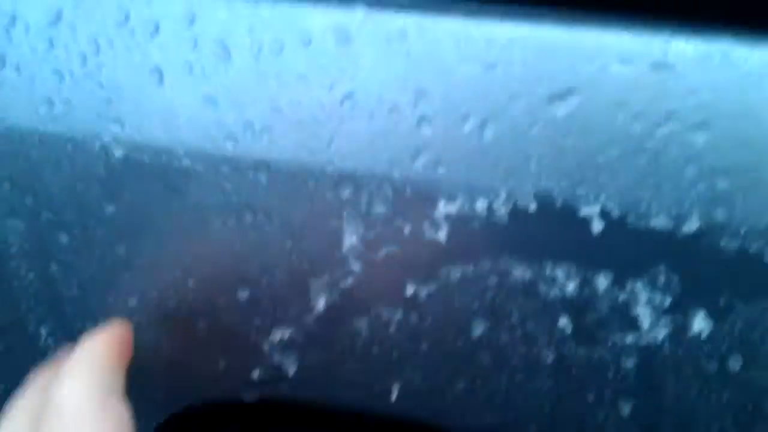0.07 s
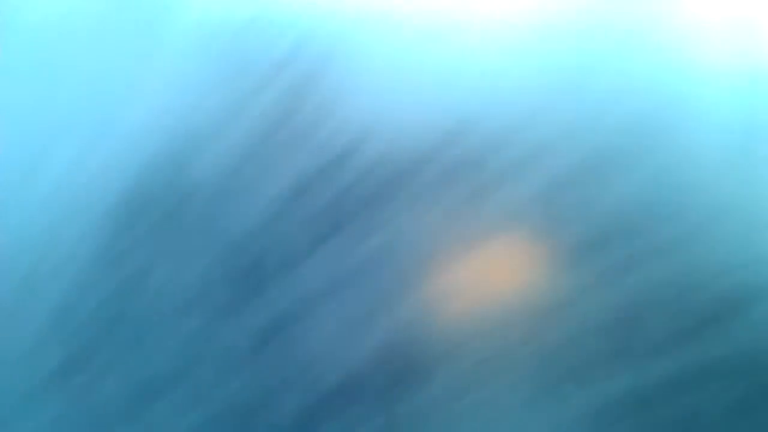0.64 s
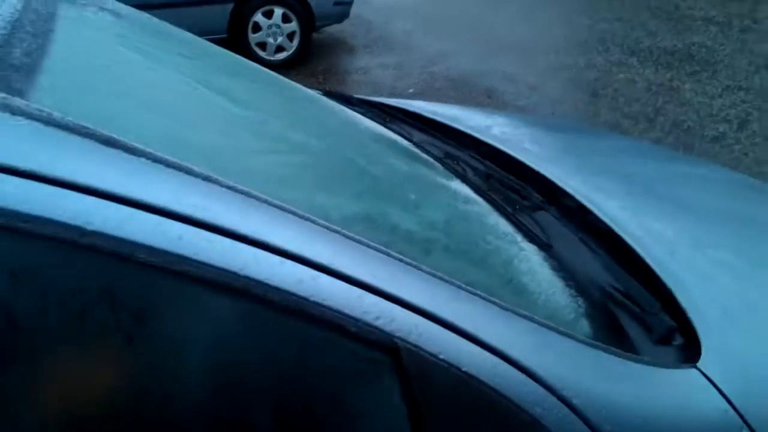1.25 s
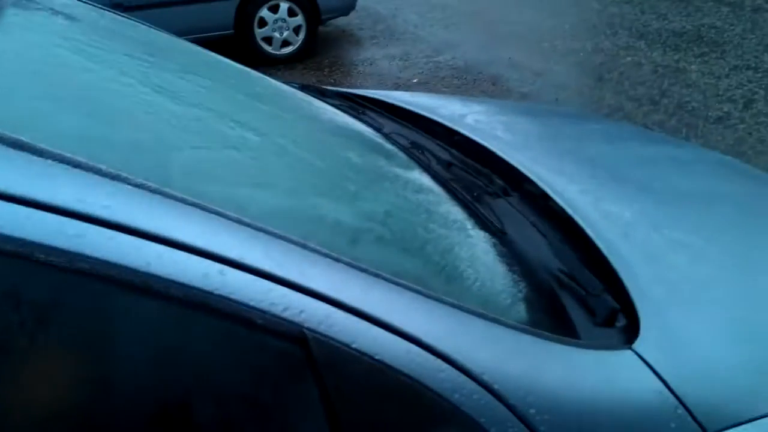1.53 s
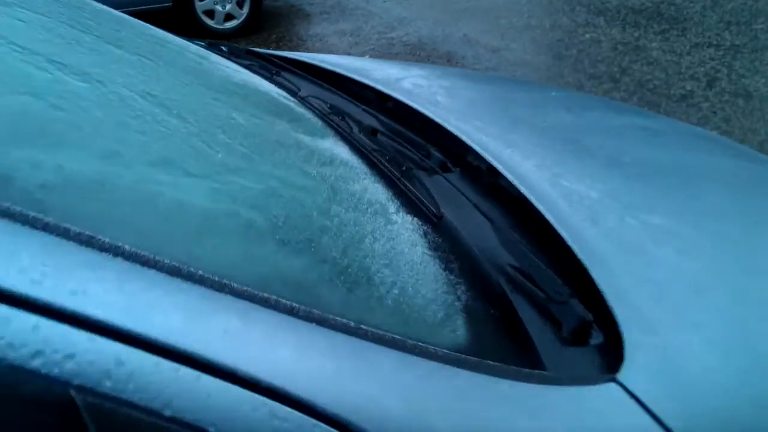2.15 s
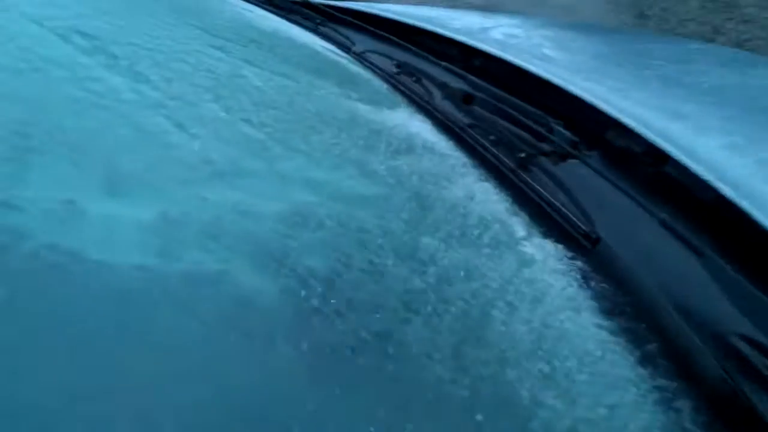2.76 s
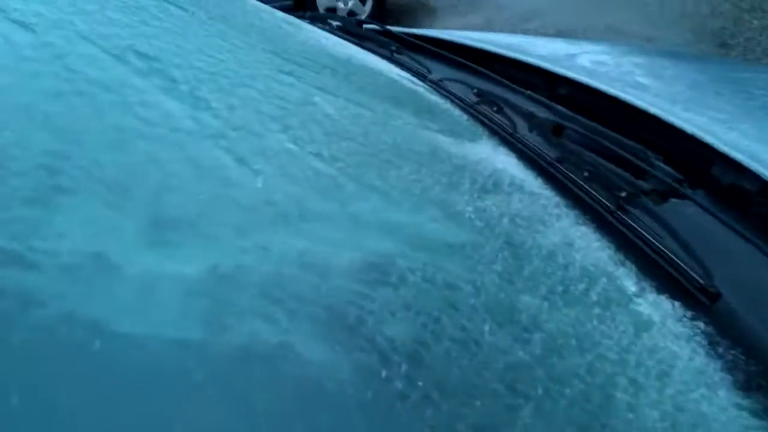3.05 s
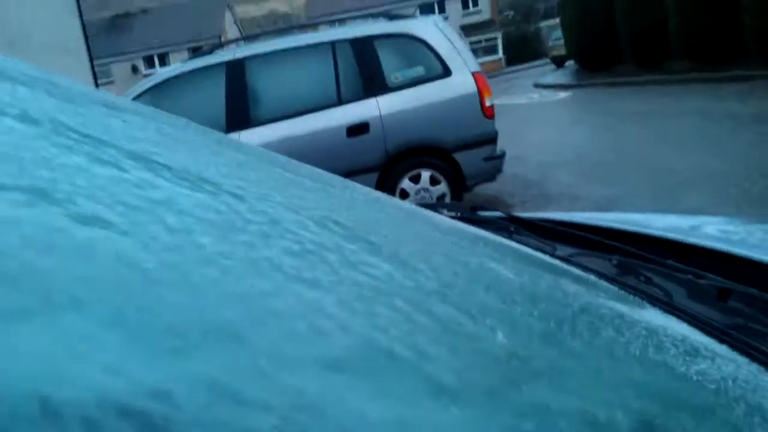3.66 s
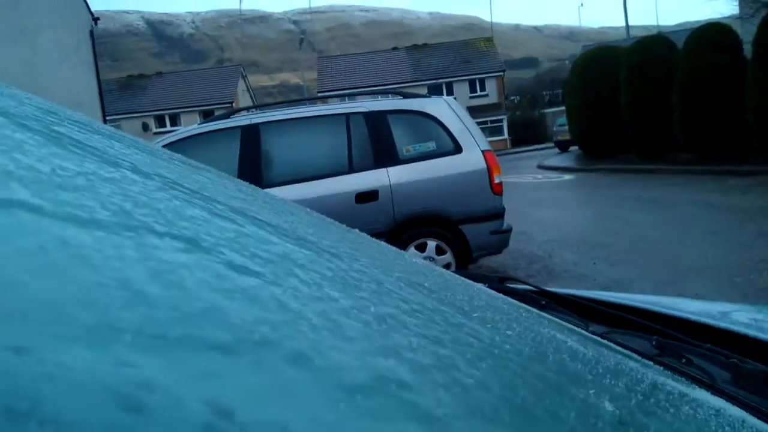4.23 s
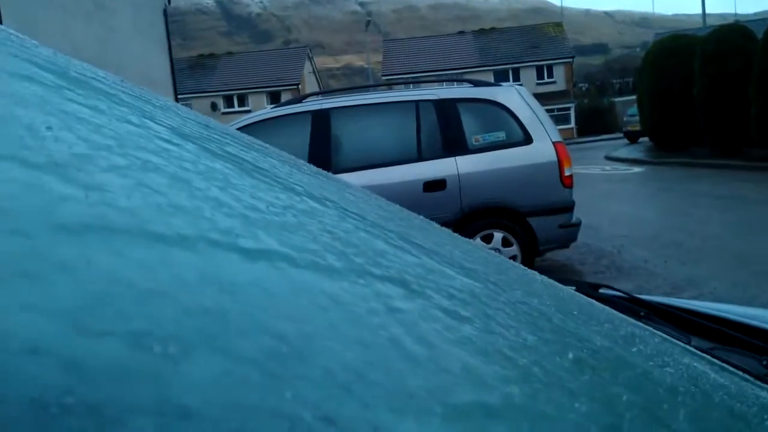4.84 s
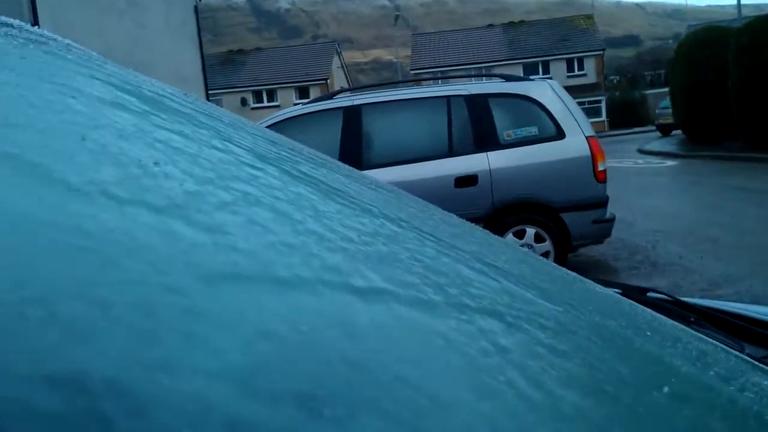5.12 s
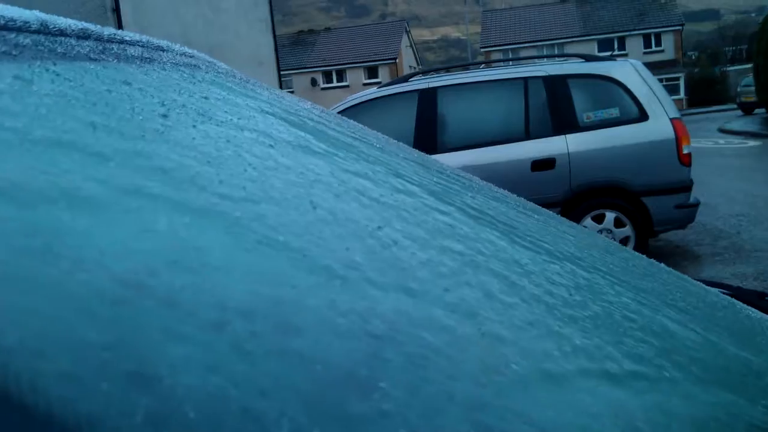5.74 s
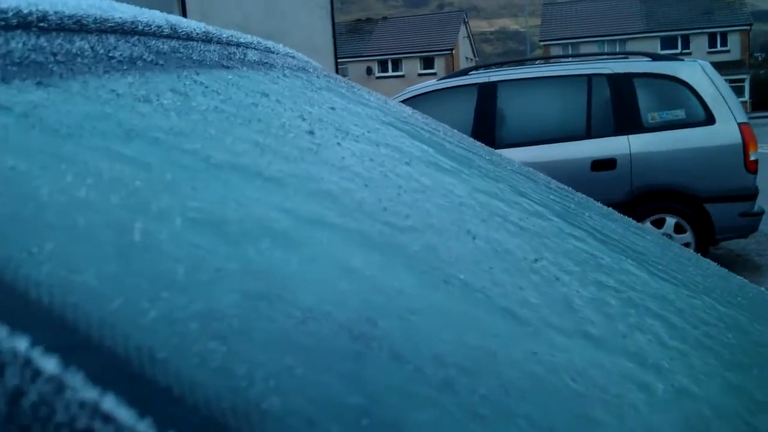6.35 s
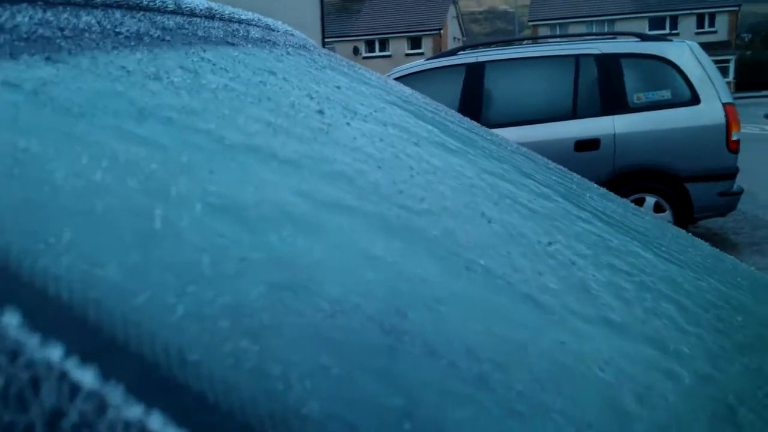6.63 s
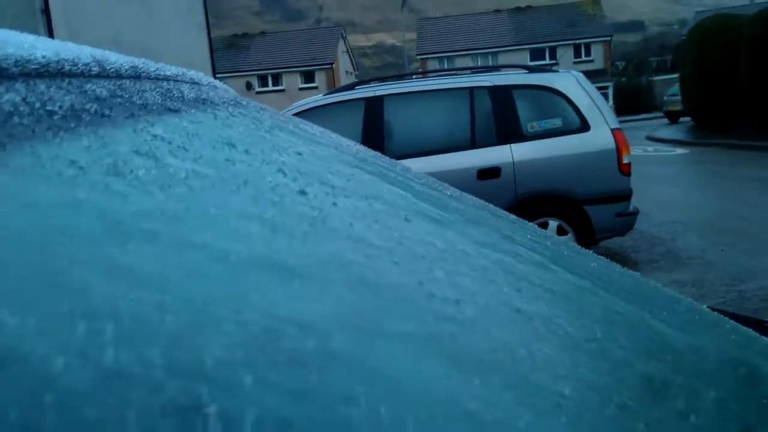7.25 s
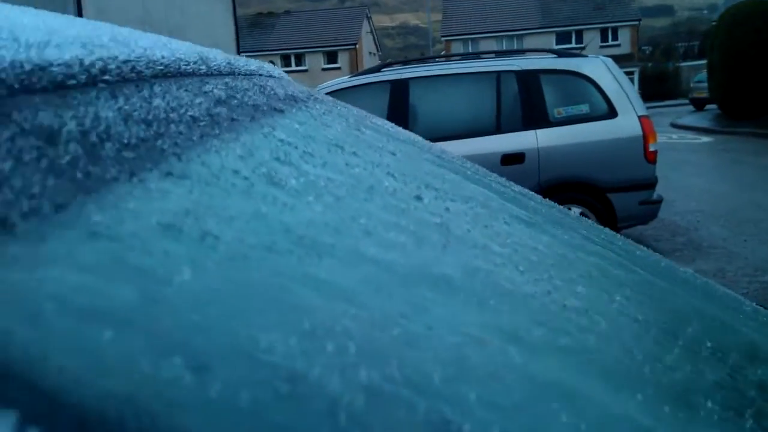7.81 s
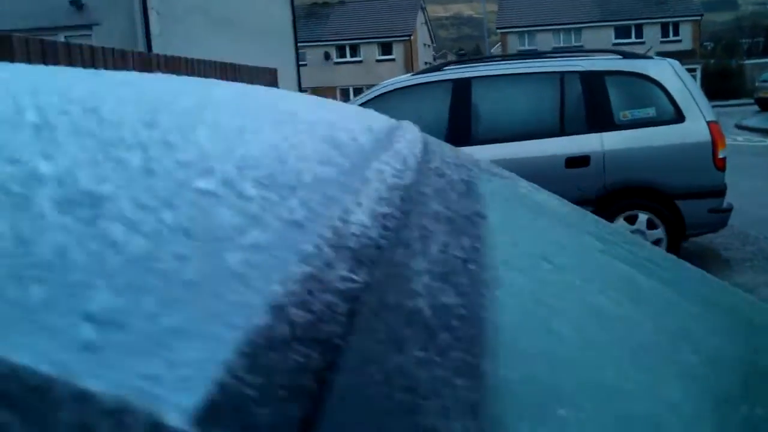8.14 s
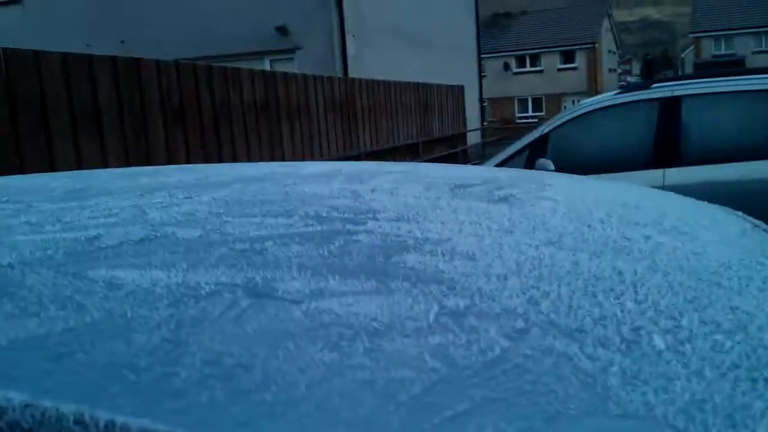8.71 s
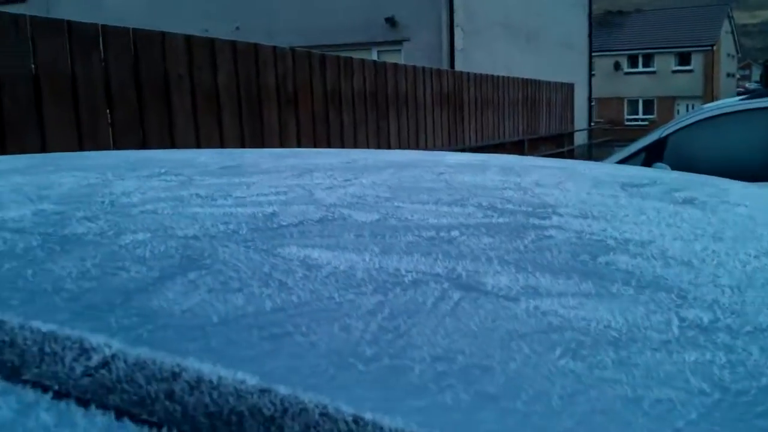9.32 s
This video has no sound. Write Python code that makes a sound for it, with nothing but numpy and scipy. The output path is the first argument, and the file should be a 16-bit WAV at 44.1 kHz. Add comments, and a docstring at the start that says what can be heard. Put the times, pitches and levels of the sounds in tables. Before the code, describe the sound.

In a quiet street with a faint town hum, someone drags their feet over icy ground right by the microphone, with several sharp cracks and knocks. Six hoarse, rattling caws from a crow stand out clearly, overlapping the last scuffs and echoing lightly off the houses. Then small birds take over with distant twittering, two high two-note calls and a brief, closer whistle near the end.

```python
"""A crow caws six times, well to the front of a quiet street on a frosty morning: rough, rattling pulses
ring its throat and open bill. Near the microphone someone scuffs over icy grit beside a car, with
a few sharp knocks, and then stands still. Small birds whistle and chirp in thin gliding tones, some
close, some far off. Behind it all lies the faint wash of the town; the houses echo a little."""
import sys
import numpy as np
from scipy import signal
from scipy.fft import rfft, irfft
from scipy.io import wavfile
from scipy.ndimage import uniform_filter1d

SR = 44100
rng = np.random.default_rng(int(sys.argv[2]) if len(sys.argv) > 2 else 0)


def int16_out(signal):
    """Quantize to a 16-bit WAV file."""
    q = np.round(np.clip(np.atleast_2d(signal).T, -1, 1) * 32767)
    wavfile.write(sys.argv[1], SR, q.astype(np.int16))


N = 413216


# The crow's throat and open bill: frequency_hz, gain_db
THROAT_SPECTRUM = [(250, -87), (500, -35), (720, -22.5), (1080, -9), (1430, -2), (1620, 0), (1820, -2.5),
                   (2130, -14.5), (2400, -24.5), (3080, -21), (3650, -38), (5600, -35.5), (8400, -27),
                   (9500, -41), (13000, -75)]
# The crow as it reaches the microphone, one row a caw: start_s, length_s, level_db
CROW_CAWS = [(2.011, 0.22, -24), (2.536, 0.25, -23), (3.087, .24, -23.5), (3.669, 0.25, -21),
             (4.245, .25, -21.5), (4.845, 0.26, -22)]
def caw(start_s, length_s, level_db, throat_width_hz=260):
    """Uneven pulses, shaken by a slowing rattle, ring a throat that rises and narrows toward the end."""
    sway, jitter, breath, flick, strain = .018, .015, .31, .18, .7
    rattle_depth, rasp_rattle_depth = .34, .48
    count = int(length_s * SR)
    pitch_hz, effort_db, rasp_db, throat_hz, narrow = caw_course(np.arange(count) / SR, length_s)
    rattle_hz = np.linspace(57.33, 36.7, count) * (1 + .04 * wander(count, 20))
    beat = 2 * np.pi * np.cumsum(rattle_hz) / SR
    shake = np.sin(beat)
    cycles = np.cumsum(pitch_hz * (1 + sway * np.cos(beat) + jitter * wander(count, 190))) / SR
    # above the tenth partial only airy rasp is left
    pulses = unit(np.cos(2 * np.pi * np.arange(1, 11)[:, None] * cycles).sum(0))
    puffs = unit((1 + np.exp(-2 * (cycles % 1))) * rng.standard_normal(count))
    air = colour(puffs, [(1000, 12.7), (2200, 15.1), (3400, 16.3), (4500, 16.2)])
    voice = unit(colour(pulses + breath * air, THROAT_SPECTRUM))
    rasp = highpass(voice, 2500, order=4)
    core = voice - rasp
    # each beat of the rattle flicks the resonance from high to low
    ringing = resonate(core, throat_hz * (1 + flick * (1 - narrow) * np.cos(beat)), throat_width_hz)
    core = (1 - narrow) * core + narrow * unit(ringing)
    # strain evens out the core's level; the beats part as the throat narrows
    envelope = uniform_filter1d(abs(signal.hilbert(core)), size=60)
    core = unit(highpass(core / envelope ** strain, 480, order=2))
    rattle = 1 + rattle_depth * (narrow * (shake + np.cos(2 * beat) / 2) + shake / 5)
    voice = core * rattle + rasp * amp(rasp_db) * (1 + rasp_rattle_depth * shake)
    return start_s, voice * amp(level_db + effort_db) * signal.windows.tukey(count, .03)


def caw_course(t, length_s, scoop=.1201, sag=.21, attack_s=.015, release_s=.047):
    """A caw scoops up to its pitch, holds its effort and sags ever faster as the air runs out."""
    progress = t / length_s
    onset = np.exp(-t / attack_s)
    release = np.maximum(1 - (length_s - t) / release_s, 0) ** 2
    pitch_hz = 363.8 * (1 - scoop * onset - sag * progress ** 3.8)
    effort_db = -29 * onset - 16.5 * release
    bill_widest, squeeze_at = .64, .835  # shares of the length
    rasp_db = 3 - 13 * (progress / bill_widest - 1) ** 2
    # the throat resonance climbs, and takes over the voice in a squeeze near the end
    throat_hz = 1260 + 440 * progress
    narrow = .37 + .31 * bell(progress - squeeze_at, .11)
    return pitch_hz, effort_db, rasp_db, throat_hz, narrow


# A scuff's cracking grit, low grinding and bright edge, each: frequency_hz, gain_db
GRIT_SPECTRUM = [(70, -39), (250, -22), (1200, -31), (2500, -12.5), (4200, 0), (6000, 1), (8000, 3.5),
                 (10500, -1), (12000, -30), (16000, -33)]
GRIND_SPECTRUM = [(60, -35), (160, -26), (300, 0), (700, 0), (1800, 9.5), (3200, 4), (6000, 2),
                  (12000, -72)]
EDGE_SPECTRUM = [(4000, -44.5), (8500, -7), (11000, 3.5), (13500, -1.5), (16000, -8)]
# A sole on the ground near the microphone, one row a stroke: peak_s, rise_s, fall_s, level_db, weight_db
SOLE_STROKES = [(.086, .007, 0.026, -37.5, -8.5), (.283, 0.0077, 0.013, -32, -14),
                (0.334, 0.073, 0.046, -26, 3.5), (.61, 0.12, 0.15, -33.5, -5),
                (0.861, 0.083, .14, -32, -4.5), (1.15, 0.058, .055, -50.5, 0.5),
                (1.368, 0.079, 0.056, -42.5, -7.5), (1.46, .09, 0.15, -56.5, 5),
                (1.976, 0.15, 0.079, -57.5, 0.5), (2.256, 0.09, 0.07, -35, 1),
                (2.96, 0.11, 0.34, -64.5, 14), (2.345, 0.0071, 0.046, -47.5, 5), (2.7, 0.19, 0.17, -52, 14),
                (3.262, .15, .11, -38, 5.5), (3.35, 0.11, 0.18, -42.5, -12), (8.45, .4, 0.6, -66, -6)]
def scuffs(grains_per_s=7000, spread_db=1.5, usual_stroke_db=-32, judder_db=1.94):
    """A sole drags over frozen grit: dense tiny cracks, with grinding under weight."""
    t = np.arange(N) / SR
    power = np.zeros((3, N))  # grit, grind, edge
    for peak_s, rise_s, fall_s, level_db, weight_db in SOLE_STROKES:
        grind_db = weight_db - 5
        # a harder stroke has a brighter edge, and weight dulls it
        edge_db = -8 + .59 * (level_db - usual_stroke_db) - .35 * weight_db
        during = (t > peak_s - 2 * rise_s) & (t < peak_s + 2 * fall_s)
        from_peak = np.maximum((peak_s - t[during]) / rise_s, (t[during] - peak_s) / fall_s)
        stroke_db = level_db - 20 * from_peak ** 2
        power[:, during] += amp(stroke_db + np.array([[0], [grind_db], [edge_db]])) ** 2
    sizes = amp(spread_db * np.minimum(rng.exponential(1, N), 4))
    grains = sizes * (rng.random(N) < grains_per_s / SR)
    textures = [unit(colour((grains + .31) * rng.standard_normal(N), spectrum))
                for spectrum in (GRIT_SPECTRUM, GRIND_SPECTRUM, EDGE_SPECTRUM)]
    return (np.sqrt(power) * textures).sum(0) * amp(judder_db * wander(N, 49))


# Close, sharp knocks and cracks among the scuffs: start_s, peak_db, ring_hz, decay_s
SHARP_KNOCKS = [(.471, -31, 1200, 0.0015), (.477, -30, 970, 0.007), (0.513, -26, 3940, 0.0028),
                (.582, -18, 2060, .006), (0.5936, -7.5, 3400, .0009), (.5946, -12, 2200, .003),
                (0.6424, -26.5, 2220, 0.0015), (.656, -27.5, 1830, .0014), (.671, -34, 650, 0.0068),
                (.781, -29, 2710, 0.0061), (1.067, -35, 600, 0.0013), (2.1408, -9, 1700, 0.0011),
                (2.1439, -2.5, 1900, 0.0015), (2.198, -13, 1940, 0.0045), (2.396, -34.5, 1320, .004),
                (2.735, -12.5, 2006, 0.00083), (2.786, -24, 1700, 0.0084), (2.985, -30.5, 1620, .002),
                (3.279, -12.5, 1250, .004), (3.293, -12.5, 1500, 0.008), (3.989, -34, 1734, .0013),
                (8.919, -38, 1930, .0018)]
def knock(start_s, peak_db, ring_hz, decay_s, grit_db=-26, grit_decay_s=.027, rise_s=.00048):
    """A short dead ring with a dry crack, and a little loose grit after it."""
    t = np.arange(SR // 12) / SR
    envelope = np.exp(-t / decay_s) + amp(grit_db) * np.exp(-t / grit_decay_s)
    spectrum = [(60, -36), (ring_hz / 4, -21), (ring_hz / 2, -7), (ring_hz, 0),
                (ring_hz * 2, -12), (ring_hz * 4, -21), (ring_hz * 8, -40)]
    crack = colour(rng.standard_normal(len(t)) * envelope, spectrum)
    ring = np.sin(2 * np.pi * ring_hz * t) * np.exp(-t / min(decay_s, .002)) * (1 - np.exp(-t / rise_s))
    low_cut = signal.butter(1, ring_hz / 3, "high", fs=SR, output="sos")
    sound = signal.sosfilt(low_cut, unit(ring) + unit(crack))
    return start_s, amp(peak_db) * sound / abs(sound).max()


# The low body of the loudest knock: frequency_hz, gain_db
THUMP_SPECTRUM = [(30, -22), (90, -8), (220, 0), (500, -10), (2000, -45)]
def thump(start_s=2.141, peak_db=-45, decay_s=.008):
    """A dull, quickly dying push under the loudest knock."""
    t = np.arange(SR // 12) / SR
    sound = colour(rng.standard_normal(len(t)) * np.exp(-t / decay_s), THUMP_SPECTRUM)
    return start_s, amp(peak_db) * sound / abs(sound).max()


def grit_ticks(ticks_per_s=7, middle_hz=2100, spread_db=4, feet_rest_s=3.6):
    """Stray bits of grit snap at random, more softly once the feet rest."""
    ticks = np.zeros(N)
    count = int(N / SR * ticks_per_s)
    for k, (when, loud, height) in enumerate(rng.random((count, 3))):
        start_s = (k + when) / ticks_per_s
        peak_db = (-43.5 if start_s < feet_rest_s else -47.5) + spread_db * (2 * loud - 1)
        add(ticks, *knock(start_s, peak_db, middle_hz * 2 ** (2 * height - 1), decay_s=.003))
    return ticks


def whistle(start_s, pitch_hz, level_db, warble=.004, warbles_per_s=42, quaver_hz=70, overtone_db=-31):
    """A small bird's thin, warbling, fluttering tone with a wide fringe of hiss."""
    count = len(pitch_hz)
    t = np.arange(count) / SR
    warbled_hz = pitch_hz * (1 + warble * np.sin(2 * np.pi * warbles_per_s * t))
    phase = 2 * np.pi * np.cumsum(warbled_hz + quaver_hz * wander(count, 650)) / SR
    tone = unit(np.sin(phase) + amp(overtone_db) * np.sin(2 * phase))
    flutter_db = 3 * wander(count, 160)
    hiss_spectrum = [(1500, -53), (3500, 2), (6500, 4.5), (9000, -4), (15000, -15)]
    hiss = unit(colour(rng.standard_normal(count), hiss_spectrum))
    sound = amp(flutter_db - 7.5) * tone + amp(-23) * hiss
    return start_s, sound * amp(level_db) * signal.windows.tukey(count, .06)


# A small bird that carries clearly down the street, one row a "tsee-tsu": start_s, pitch_hz, gain_db
TWO_NOTE_CALLS = [(6.172, 6190, -25.5), (7.377, 5950, -29.5)]
def tsee(start_s, pitch_hz, gain_db, length_s=.1285, swell_db=14.5, hook_s=.0084):
    """The first note swells and creeps upward, then ends in a hook."""
    t = np.arange(0, length_s, 1 / SR)
    climb = .04 * t / length_s
    hook = .1 * bell(t - length_s + hook_s, hook_s)
    level_db = gain_db - swell_db * (1 - t / length_s) ** 2
    return whistle(start_s, pitch_hz * (1 + climb + hook), level_db, warble=.018)


def tsu(middle_s, gain_db, length_s=.08, first_hz=6680, last_hz=5610, slur_s=.0106, fade_db_per_s=750):
    """The second note slurs from high to low, loudest on the way down."""
    t = np.arange(-length_s / 2, length_s / 2, 1 / SR)
    pitch_hz = first_hz + (last_hz - first_hz) * (1 + np.tanh(t / slur_s)) / 2
    return whistle(middle_s + t[0], pitch_hz, gain_db - fade_db_per_s * abs(t))


def high_note(start_s=8.999, length_s=.14, pitch_hz=8350, gain_db=-32, dip_at_s=.037, dip_width_s=.029):
    """A bird closer to the microphone holds one high whistle that dips in pitch and recovers."""
    t = np.arange(0, length_s, 1 / SR)
    dip = .08 * bell(t - dip_at_s, dip_width_s)
    return whistle(start_s, pitch_hz * (1 - dip), gain_db)


# The closer bird's lower voice, one row a yip: peak_s, rise_s, fall_s, top_hz, gain_db
CLOSE_YIPS = [(9.058, .036, .022, 4135, -20.5), (9.122, .018, .018, 3650, -25)]
def yip(peak_s, rise_s, fall_s, top_hz, gain_db, depth_db=20, octaves_per_db=.02):
    """A whistle whose pitch and level arch together with the bird's effort."""
    t = np.arange(-rise_s, fall_s, 1 / SR)
    effort_db = -depth_db * np.maximum(-t / rise_s, t / fall_s) ** 2
    pitch_hz = top_hz * 2 ** (octaves_per_db * effort_db)
    return whistle(peak_s - rise_s, pitch_hz, gain_db + effort_db, overtone_db=-19)


# Small birds around the street: start_s, length_s, first_hz, last_hz, level_db, hoarse_share (of pitch)
STREET_CHIRPS = [(1.339, 0.038, 1650, 1600, -43, .011), (1.574, .094, 7350, 6250, -65.5, .004),
                 (2.338, .032, 6850, 6800, -49, .003), (5.368, .058, 6250, 5200, -62, .004),
                 (5.712, .11, 4580, 3800, -54.5, 0.25), (6.443, 0.039, 4400, 3850, -51.5, 0.052),
                 (6.52, .045, 4930, 5070, -60, .004), (6.64, 0.06, 4720, 4880, -57, .008),
                 (6.694, 0.033, 4800, 3750, -57, 0.012), (7.651, .067, 4200, 4170, -55.5, 0.24),
                 (7.74, 0.059, 4830, 4480, -51.5, 0.0092), (7.991, .035, 6100, 6600, -58.5, 0.016),
                 (8.12, 0.069, 3560, 3470, -51.5, 0.044), (8.512, .025, 3650, 3100, -56, .02),
                 (8.952, 0.046, 5230, 5050, -59, .005), (8.992, 0.043, 8500, 8030, -37, 0.077),
                 (8.998, 0.044, 4840, 4460, -40, 0.32)]
def chirp(start_s, length_s, first_hz, last_hz, level_db, hoarse_share):
    """A short glide; an unsteady pitch makes it hoarse."""
    count = int(length_s * SR)
    unsteady = np.exp(hoarse_share * np.clip(wander(count, 900), -2, 2))
    pitch_hz = np.geomspace(first_hz, last_hz, count) * unsteady
    tone = unit(np.sin(2 * np.pi * np.cumsum(pitch_hz) / SR))
    return start_s, amp(level_db) * tone * signal.windows.tukey(count, .7)


# Sparrow-like chatter, faint at the microphone, one row a burst: start_s, length_s, level_db
CHATTER_BURSTS = [(5.747, 0.086, -54.5), (6.596, 0.052, -48.5), (6.637, 0.037, -58.5), (7.072, 0.064, -58),
                  (7.8, 0.088, -59.5)]
def chatter(start_s, length_s, level_db, pitch_hz=2470, pulses_per_s=85, depth=.67):
    """A hoarse note broken into quick pulses."""
    _, note = chirp(start_s, length_s, pitch_hz, pitch_hz, level_db, hoarse_share=.123)
    t = np.arange(len(note)) / SR
    return start_s, note * (1 + depth * np.sin(2 * np.pi * pulses_per_s * t))


def distant_twitter(from_s=3.9, notes_per_s=17, middle_hz=4200, level_db=-66, spread_db=3.5, echo_db=-1):
    """Songbirds far off: short glides, mostly falling, clear or hoarse, blurred by the street."""
    notes = np.zeros(N)
    count = int((N / SR - from_s) * notes_per_s)
    for k, (when, length, height, slope, loud, rough) in enumerate(rng.uniform(-1, 1, (count, 6))):
        start_s = from_s + (k + when) / notes_per_s
        length_s = .038 * 2 ** length
        first_hz = middle_hz * 1.55 ** height
        last_hz = first_hz * (.86 + .22 * slope)
        add(notes, *chirp(start_s, length_s, first_hz, last_hz, level_db + spread_db * loud, .1 * abs(rough)))
    return notes + amp(echo_db) * street_echo(notes)


# How long sound lingers between the houses: frequency_hz, t60_s
STREET_DECAY = [(300, 2.7), (1700, 2.24), (4000, 3.8), (9000, 0.85), (15000, 0.39)]
def street_echo(x, delay_s=.0067, reflections_per_s=1500):
    """Sparse late reflections from the houses; the highest treble dies first."""
    count = 3 * SR // 2
    reflections = rng.standard_normal(count) * (rng.random(count) < reflections_per_s / SR)
    reflections *= np.arange(count) > delay_s * SR
    hz, t, bands = signal.stft(reflections, SR, nperseg=256)
    decay = amp(-60 * t / read_curve(STREET_DECAY, hz)[:, None])
    _, tail = signal.istft(bands * decay, SR, nperseg=256)
    return signal.fftconvolve(x, tail / np.linalg.norm(tail))[:N]


# The far town as heard from the street: frequency_hz, gain_db
TOWN_SPECTRUM = [(18, -74), (30, -40), (38, -60.5), (251, -4.5), (424, -3), (471, 0), (596, -3),
                 (931, -2.5), (1750, -9), (2390, -10.5), (3190, -17.5), (3450, -10.5), (5830, -21),
                 (9350, -19.5), (15800, -21)]
def town_wash(level_db=-57, swell_db=.63, drift_db=.8):
    """The wash of the far town; its lower and upper parts drift apart a little in level."""
    town = unit(colour(rng.standard_normal(N), TOWN_SPECTRUM, size=8192))
    upper = highpass(town, 660, order=3)
    lower = town - upper
    swell = amp(level_db + swell_db * wander(N, 6.4))
    return swell * (upper + lower * amp(drift_db * wander(N, 5.0)))


def amp(db):
    """Decibels to gain."""
    return 10 ** (np.asarray(db) / 20)


def unit(x):
    """Scales to rms 1."""
    return x / np.sqrt(np.mean(x ** 2) + 1e-20)


def bell(x, width):
    """A smooth bump of height 1 around zero."""
    return np.exp(-(x / width) ** 2)


def wander(count, rate_hz):
    """A smooth random curve of rms 1, no faster than about rate_hz."""
    hz = np.fft.rfftfreq(count, 1 / SR)
    spectrum = rfft(rng.standard_normal(count))
    return unit(irfft(spectrum * (hz > 0) / (1 + (hz / rate_hz) ** 4), count))


def read_curve(points, hz):
    """Interpolates (frequency_hz, value) points on a log-frequency axis."""
    point_hz, values = np.transpose(points)
    return np.interp(np.log(hz + 1), np.log(point_hz), values)


def colour(x, spectrum, size=2048):
    """Causal filter through the given (frequency_hz, gain_db) points."""
    log_gain = np.log(amp(read_curve(spectrum, abs(np.fft.fftfreq(size, 1 / SR)))))
    taps = np.fft.ifft(np.exp(np.conj(signal.hilbert(log_gain)))).real  # minimum phase
    return signal.oaconvolve(x, taps)[:len(x)]


def highpass(x, hz, order):
    """Keeps what lies above hz, without delay."""
    return signal.sosfiltfilt(signal.butter(order, hz, "high", fs=SR, output="sos"), x)


def resonate(x, hz, width_hz):
    """A resonance of gain 1 that follows the curve hz."""
    carrier = np.exp(2j * np.pi * np.cumsum(hz) / SR)
    pole = np.exp(-np.pi * width_hz / SR)
    return 2 * (carrier * signal.lfilter([1 - pole], [1, -pole], x / carrier)).real


def add(mix, start_s, sound):
    """Mixes a sound in at start_s."""
    part = mix[max(round(start_s * SR), 0):][:len(sound)]
    part += sound[:len(part)]


def scene(crow_echo_db=-29, bird_echo_db=-28, step_echo_db=-27, wall_db=-31, wall_delay_s=.09):
    """Crow, footwork and small birds from one spot in the street; one wall throws the caws back."""
    crow, birds = np.zeros(N), np.zeros(N)
    steps = scuffs() + grit_ticks()
    for row in CROW_CAWS:
        add(crow, *caw(*row))
    for start_s, pitch_hz, gain_db in TWO_NOTE_CALLS:
        add(birds, *tsee(start_s, pitch_hz, gain_db))
        add(birds, *tsu(start_s + .235, gain_db + 3.5))
    add(birds, *high_note())
    for row in CLOSE_YIPS:
        add(birds, *yip(*row))
    for row in CHATTER_BURSTS:
        add(birds, *chatter(*row))
    for row in STREET_CHIRPS:
        add(birds, *chirp(*row))
    for row in SHARP_KNOCKS:
        add(steps, *knock(*row))
    add(steps, *thump())
    echo = street_echo(amp(crow_echo_db) * crow + amp(bird_echo_db) * birds + amp(step_echo_db) * steps)
    add(echo, wall_delay_s, amp(wall_db) * crow)
    return (crow + birds + steps + echo + distant_twitter() + town_wash())[None]


def record(dry, low_cut_hz=80, band_limit_hz=15800):
    """One small microphone drops the bass; the recorder's band limit trims the highest treble."""
    thin = signal.sosfilt(signal.butter(2, low_cut_hz, "high", fs=SR, output="sos"), dry)
    band_limit = signal.firwin(511, band_limit_hz, window=("kaiser", 9), fs=SR)
    return signal.oaconvolve(thin, band_limit[None], "same")


dry = scene()
out = record(dry)
int16_out(out)
```